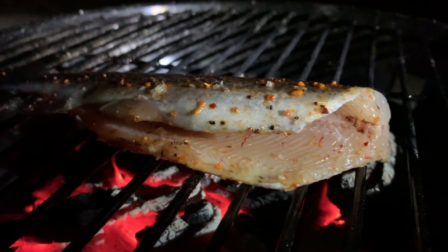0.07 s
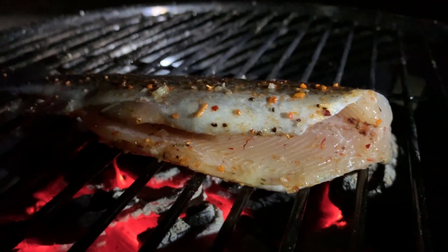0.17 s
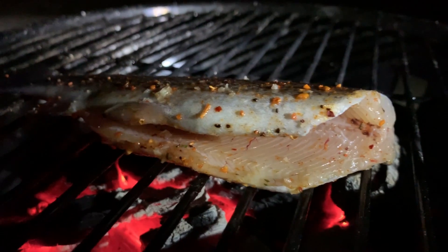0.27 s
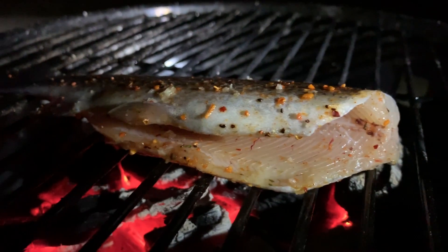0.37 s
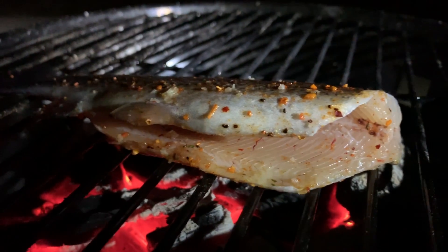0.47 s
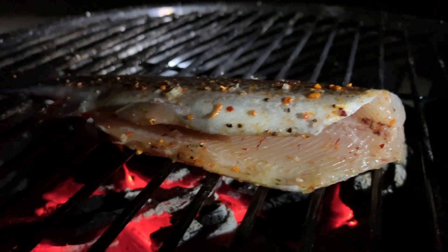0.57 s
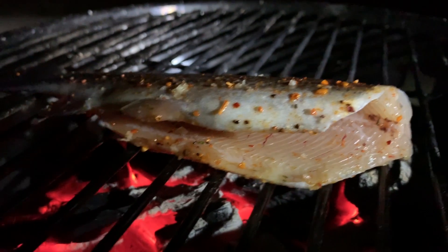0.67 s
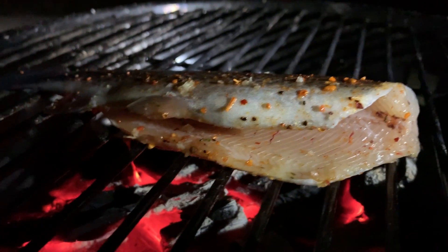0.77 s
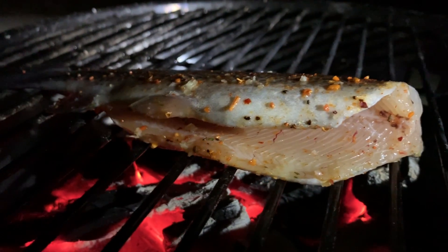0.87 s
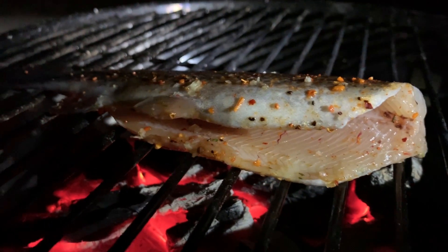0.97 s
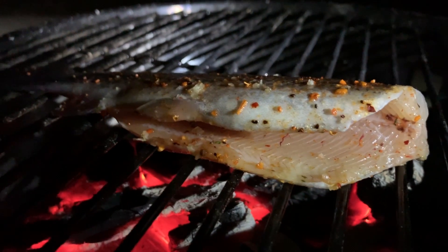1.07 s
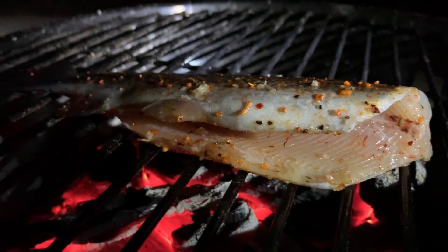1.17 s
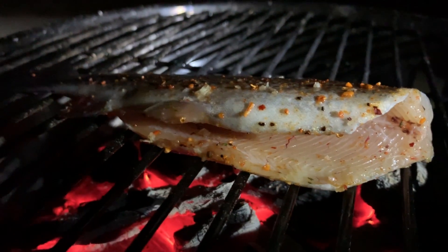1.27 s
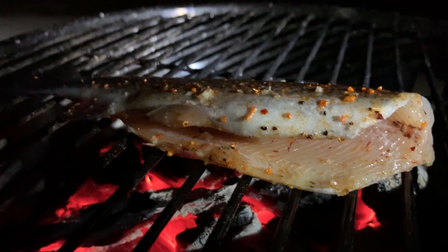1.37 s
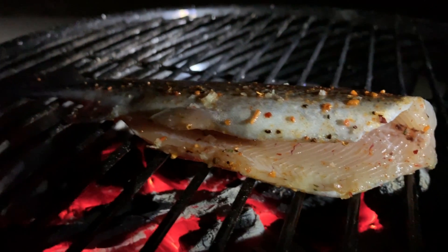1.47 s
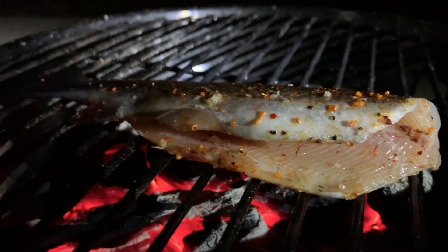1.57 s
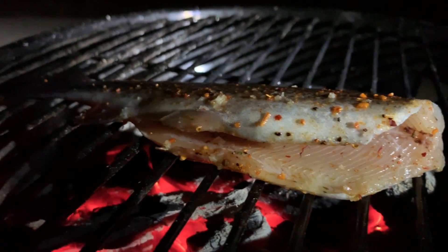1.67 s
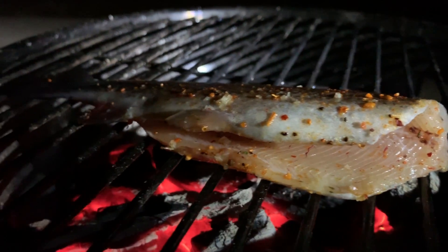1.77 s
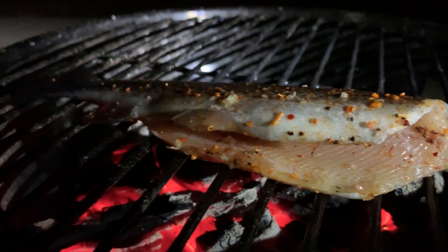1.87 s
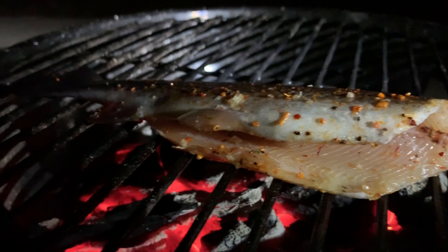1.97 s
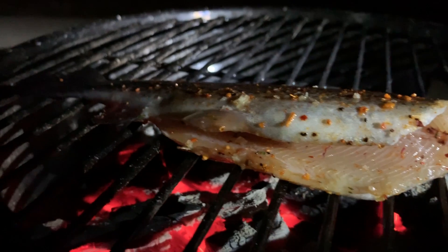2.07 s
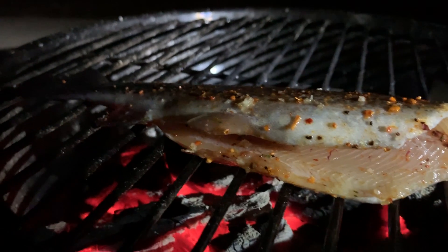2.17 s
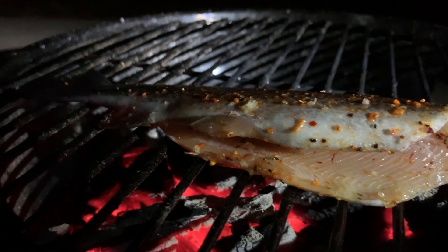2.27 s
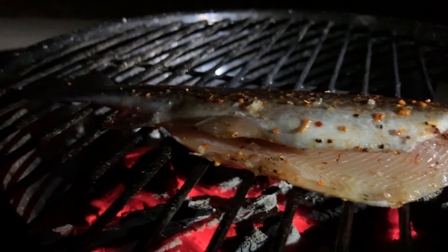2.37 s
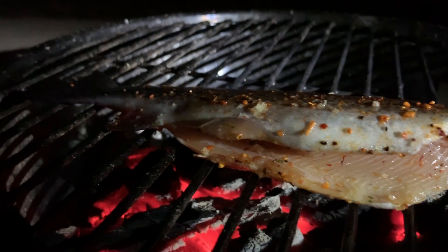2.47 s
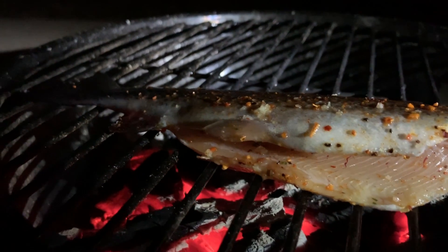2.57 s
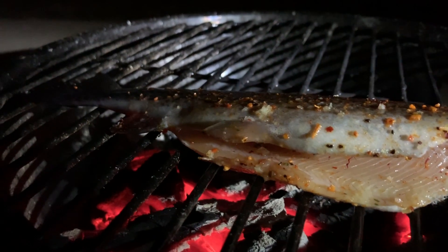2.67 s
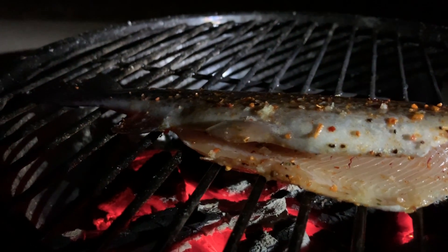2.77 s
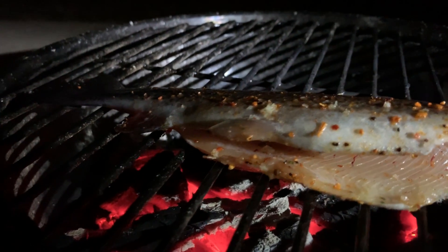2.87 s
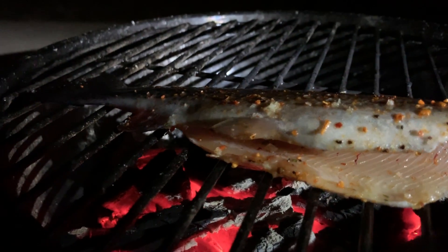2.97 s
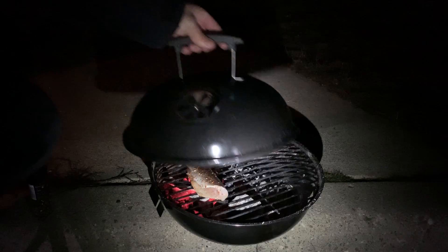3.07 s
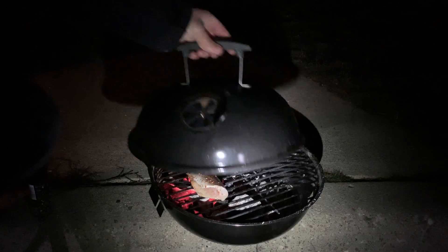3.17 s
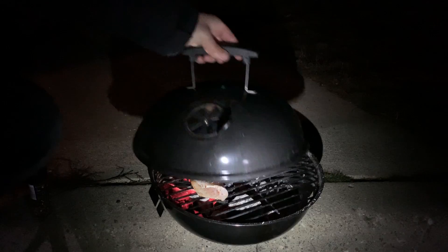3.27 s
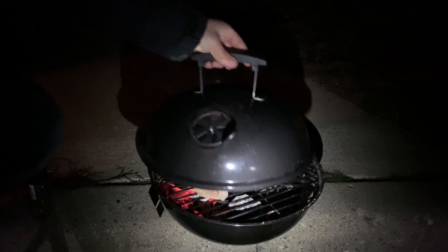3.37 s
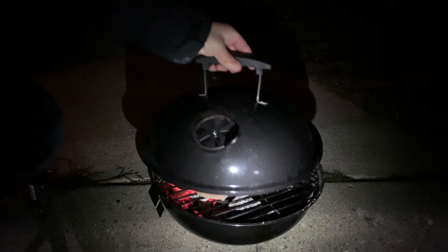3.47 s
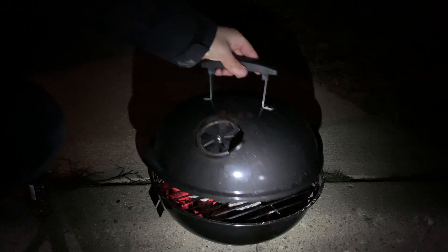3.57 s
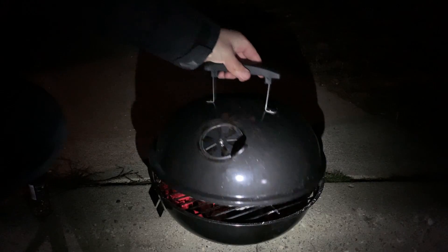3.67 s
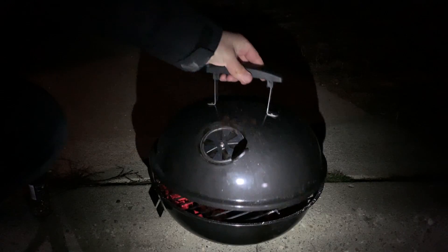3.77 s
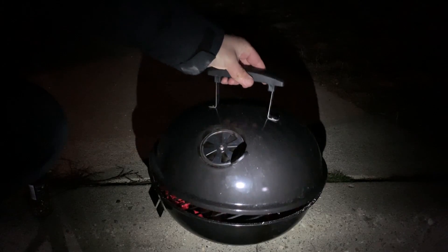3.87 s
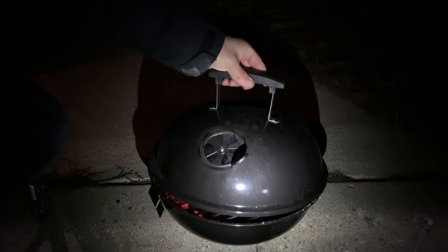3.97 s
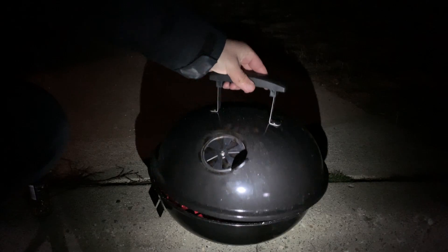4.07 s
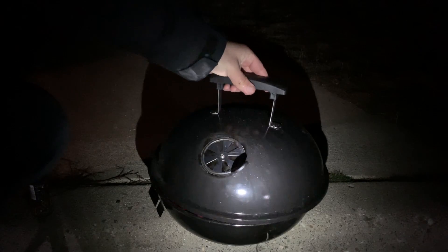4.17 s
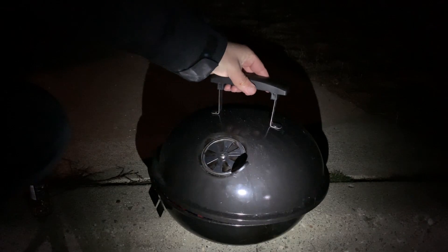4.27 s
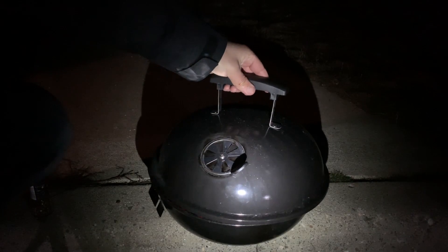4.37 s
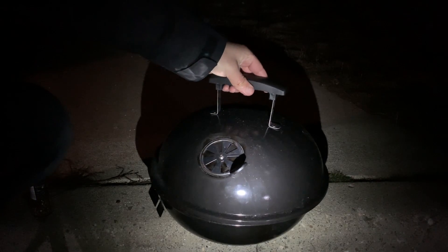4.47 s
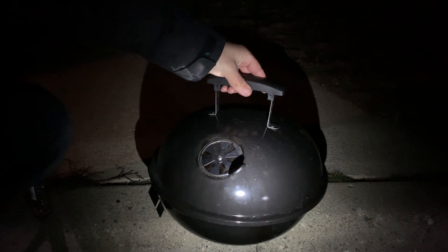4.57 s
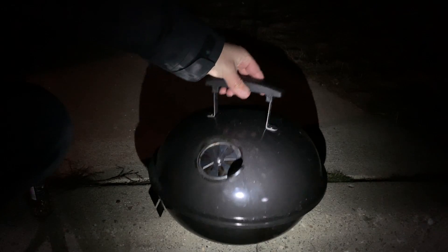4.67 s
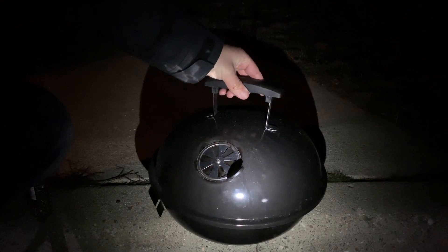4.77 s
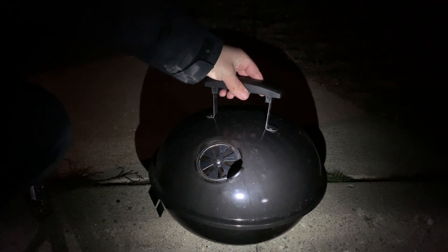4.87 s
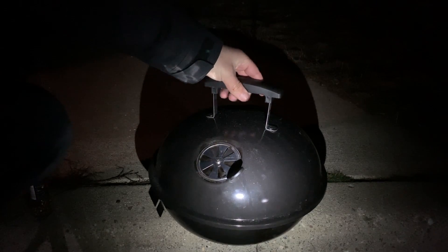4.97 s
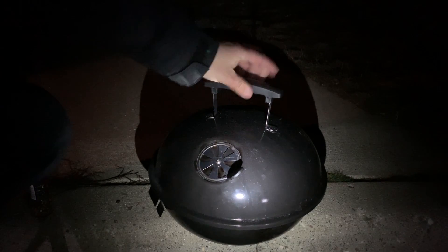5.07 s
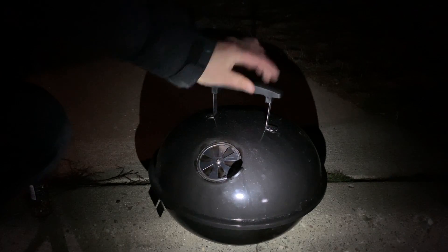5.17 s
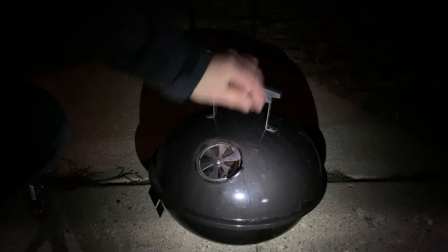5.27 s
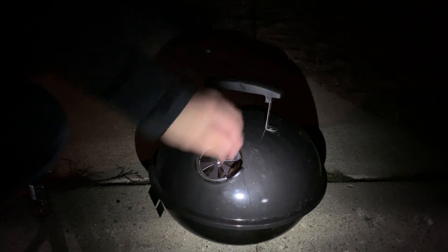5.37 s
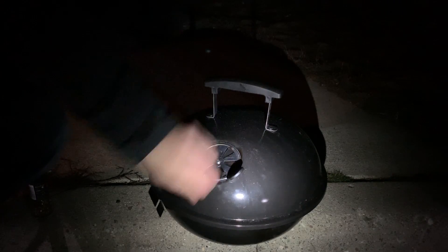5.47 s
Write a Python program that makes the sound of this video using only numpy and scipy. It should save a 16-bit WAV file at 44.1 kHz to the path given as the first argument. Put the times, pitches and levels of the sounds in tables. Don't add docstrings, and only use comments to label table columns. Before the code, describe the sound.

Fish fries softly over crackling coals at night; a faint bird whistles, a steel grill lid lands, scrapes and drops shut loudly.

```python
import sys
import numpy as np
from scipy import signal
from scipy.fft import rfft, irfft, next_fast_len
from scipy.io import wavfile
from scipy.ndimage import uniform_filter1d

SR = 44100
rng = np.random.default_rng(int(sys.argv[2]) if len(sys.argv) > 2 else 0)


def linear_from_db(decibels):
    return 10 ** (np.asarray(decibels, float) / 20)


def output_pcm(signal):
    pcm = np.clip(np.atleast_2d(signal).T, -1, 1) * 32767
    wavfile.write(sys.argv[1], SR, np.round(pcm).astype(np.int16))


N = 242991
CUT_S = 3.118
SIZE = next_fast_len(N + SR // 2)
HZ = np.maximum(np.arange(SIZE // 2 + 1) * SR / SIZE, 1)
T = np.arange(N) / SR
HALF_S, TENTH_S, TWENTIETH_S = T[:SR // 2], T[:SR // 10], T[:SR // 20]


def across(table, column, hz=HZ):
    table = np.array(table, float)
    return np.interp(np.log(hz), np.log(table[:, 0]), table[:, column])


def curve(table):
    time_s, level_db = np.transpose(table)[:2]
    return linear_from_db(np.interp(T, time_s, level_db, left=-200, right=-200))


def shape(x, gain):
    return irfft(rfft(x, SIZE) * gain, SIZE)[..., :N]


def unit(x):
    return x / np.sqrt(np.mean(x ** 2))


def walk(rate_hz):
    hold = int(SR / rate_hz)
    steps = np.repeat(rng.standard_normal(N // hold + 1), hold)
    return 1.3 * uniform_filter1d(uniform_filter1d(steps, hold), hold)[:N]


def decay(t, t60_s):
    return np.exp(-np.log(1000) * t / t60_s)


def ring(modes, phase=0.):
    hz, db, t60_s = np.array(modes, float).T[:, :, None]
    return np.sum(linear_from_db(db) * decay(HALF_S, t60_s) * np.sin(2 * np.pi * hz * HALF_S + phase), axis=0)


def add(track, start_s, sound):
    i = int(start_s * SR)
    track[..., i:i + sound.shape[-1]] += sound[..., :N - i]


def half_octave(hz, centre_hz):
    return np.cos(np.pi * np.clip(np.log2(hz / centre_hz), -.5, .5)) ** 2


def grains(density_hz, scatter_db):
    size = linear_from_db(scatter_db * rng.exponential(size=(2, N))) * rng.standard_normal((2, N))
    return size * (rng.random((2, N)) < density_hz / SR)


# pitch_hz, close_db_per_hz, far_db_per_hz
AIR = [(25.1, -70.5, -74), (60, -61, -64), (147.8, -65.5, -71.5), (215, -68.5, -75), (285, -67, -70),
       (331, -70.5, -78.5), (442, -71, -79), (680, -82, -93), (1043, -94, -101.5), (1330, -103, -110),
       (2500, -107.5, -114), (5000, -107, -113), (10300, -102, -108), (12500, -107, -113),
       (14500, -110, -116), (15970, -114, -118)]


def air():
    out, swell, noise = 0, walk(1.5), rfft(rng.standard_normal((2, SIZE)))
    gain = linear_from_db([[across(AIR, 1)], [across(AIR, 2)]])
    for centre_hz in 18 * 2 ** np.arange(0, 10, .5):
        close, far = irfft(noise * half_octave(HZ, centre_hz) * gain, SIZE)[..., :N]
        out = out + np.where(T < CUT_S, close, far) * linear_from_db(swell + 1.06 * walk(11))
    return out * np.sqrt(SR / 2)


# pitch_hz, level_db
FAT = [(2500, -20), (4000, -3), (5500, 0), (6500, 5), (7600, 12), (9000, -2), (11000, -12), (13000, -25),
       (16000, -13)]
# centre_s, change_db, half_width_s
FLURRIES = [
    (.15, -9, .2),
    (.4, 5, .09),
    (.62, -3, .1),
    (1.1, 5, .09),
    (1.88, 2, .08),
    (2.06, -6, .09),
    (2.42, 3.5, .17),
    (3.0, -3, .08),
]


def sizzle():
    fat, bubbles = 0, shape(grains(5000, 2.2), linear_from_db(across(FAT, 1)))
    for centre_hz in 2800 * 2 ** np.arange(0, 3, 1 / 3):
        band = np.cos(np.pi / 2 * np.clip(3 * np.log2(HZ / centre_hz), -1, 1)) ** 2
        fat = fat + shape(bubbles, band) * linear_from_db(1.8 * walk(6.7) + 1.2 * walk(30))
    frying_db = -63 + sum(db * np.exp(-((T - s) / width_s) ** 2) for s, db, width_s in FLURRIES)
    return unit(fat) * (T < CUT_S) * linear_from_db(frying_db + 1.45 * walk(25) + 1.2 * walk(70))


def singing(count=500):
    out, t = np.zeros((2, N)), TWENTIETH_S
    bubble_db, bubble_t60_s, max_glide = -62, .03, .04
    for when, place, size, glide, length, kind in rng.random((count, 6)):
        hz = (7400 if kind < .6 else 4100 if kind < .8 else 5600) * (1 + .24 * (place - .5))
        phase = 2 * np.pi * hz * t * (1 + max_glide * (2 * glide - 1) * t / bubble_t60_s)
        fade = decay(t, bubble_t60_s * (.5 + 2 * length)) * np.minimum(t / .002, 1)
        level_db = bubble_db - 2.4 * np.log(size) - 6 * (kind >= .6)
        add(out, when * (CUT_S - .05), linear_from_db(level_db) * fade * np.array([np.sin(phase), np.cos(phase)]))
    return out


def soft_rise(t):
    return np.minimum(t / .0005, 1) ** 2


def tick(peak_db, hz, t60_s, crack_db, width_octaves):
    t = TENTH_S
    octave = np.log2(np.maximum(np.fft.rfftfreq(len(t), 1 / SR), 1))
    crack = rng.standard_normal((2, len(t))) * (np.exp(-t / .0011) + .25 * np.exp(-t / .006))
    crack = irfft(rfft(crack) * np.exp(-((octave - np.log2(hz)) / width_octaves) ** 2), len(t))
    tone = np.sin(2 * np.pi * hz * t + np.array([[0], [np.pi / 2]])) * decay(t, t60_s)
    sound = linear_from_db(peak_db) * (.58 * soft_rise(t) * tone + linear_from_db(crack_db) * crack / np.abs(crack).max())
    return np.roll(sound, SR // 1000, axis=1)


# start_s, peak_db, ring_hz, crack_db
SPITS = [(0.1795, -51.5, 7700, 3.5), (0.7143, -45.5, 7540, 2), (0.8305, -43, 7800, -6),
         (1.0929, -36, 7130, -1.5), (1.1568, -43, 6970, -3), (1.2805, -50, 8100, 0),
         (1.2904, -45.5, 8600, 0), (1.6352, -53.5, 7050, 9), (1.8472, -42, 7730, 5.5),
         (1.9011, -39.5, 8400, 8), (1.9174, -48, 6940, 0), (2.3391, -46, 7600, 3),
         (2.5311, -42.5, 8890, 2.5), (2.7217, -48.5, 7210, 6.5), (3.468, -63, 8180, 0),
         (3.5064, -44.5, 7060, -2.5), (3.5818, -51, 7600, 4), (3.7249, -46, 8820, 2.5),
         (3.7778, -46, 6830, 0.5)]
FLAKES = [(0.2922, -47, 4840, -3), (0.3571, -33.5, 10740, -6), (0.3576, -44.5, 13200, -10),
          (1.0929, -46, 14700, -3), (1.0935, -40, 10100, -3), (1.9011, -42, 11800, 0),
          (1.7838, -42, 12900, -6), (1.7845, -49, 7250, -8), (2.462, -50, 7000, -4),
          (3.5064, -42.5, 12600, -4), (3.9644, -62.5, 13200, -6), (5.1432, -52.5, 2290, -10)]
LUMPS = [(0.5616, -53, 1730, 0.5), (1.1029, -51, 2370, -6), (2.053, -43, 840, -8), (2.0657, -38, 1690, -22),
         (2.066, -32, 1030, -9), (2.7187, -54.5, 1730, -2), (3.638, -46.5, 1260, -4.5),
         (3.7698, -58, 2480, -4), (5.342, -44, 620, -2), (5.265, -54, 850, -4)]
SPLITS = [
    (1.3992, -46, 2410, 1),
    (2.5686, -46, 4950, 7.5),
    (2.5686, -48, 2000, 6),
    (2.9766, -42, 1410, 7),
    (2.9771, -49, 3400, 7),
    (2.978, -41, 1230, -7),
    (3.1053, -52, 1860, -3),
    (3.1154, -50, 2010, -2),
]


def coals():
    out = np.zeros((2, N))
    # ticks, ring t60_s, crack width_octaves
    kinds = [(SPITS, .026, .64), (FLAKES, .04, .33), (LUMPS, .025, .6), (SPLITS, .012, .95),
             ([(3.7818, -50, 2530, -12)], .09, .4)]
    for rows, t60_s, width_octaves in kinds:
        for start_s, peak_db, hz, crack_db in rows:
            add(out, start_s - .001, tick(peak_db, hz, t60_s, crack_db, width_octaves))
    return out


# pitch_hz, level_db, t60_s
GRATE = [(2335, -4, 0.085), (3994, -11.5, 0.14), (5400, -3, 0.05), (7050, 5, .035), (7560, 3, 0.022),
         (9750, -4, 0.028), (12130, -5.5, .04), (13550, -6, .022)]


def grate_ping(start_s=2.4113):
    out = np.zeros((2, N))
    add(out, start_s - .001, tick(-22, 6800, .008, 5, 1.2))
    bars = np.array([ring(GRATE), ring(GRATE, -np.pi / 2)]) / 2
    add(out, start_s, linear_from_db(-21) * soft_rise(HALF_S) * bars)
    return out


# top_s, top_hz, climb_s, sink_s (times for one slur)
BIRD = [
    (3.165, 4660, .035, .13),
    (3.45, 4330, .055, .045),
    (3.54, 4670, .035, .06),
    (3.588, 4630, .09, .094),
    (3.852, 4370, .045, .045),
    (3.945, 4650, .032, .055),
    (4.003, 4660, .035, .075),
]


def bird():
    slur_hz, full_hz, silent_hz = 850, 4560, 3760
    full_db, climb_loss_db, sink_loss_db = -74, 48, 27
    arches = [hz - slur_hz * np.where(T < s, (T - s) / climb_s, (T - s) / sink_s) ** 2
              for s, hz, climb_s, sink_s in BIRD]
    pitch_hz = np.maximum(np.max(arches, axis=0), silent_hz)
    slur_loss_db = np.where(np.gradient(pitch_hz) > 0, climb_loss_db, sink_loss_db)
    loss_db = slur_loss_db * ((pitch_hz - full_hz) / slur_hz) ** 2
    level = linear_from_db(full_db - loss_db + 2.5 * walk(40)) * (pitch_hz > silent_hz)
    level = uniform_filter1d(level, size=400)
    phase = 2 * np.pi * np.cumsum(uniform_filter1d(pitch_hz, size=300)) / SR
    voice = np.sin(phase) * level
    under = np.sin(phase / 2) * level
    return linear_from_db(6.8) * np.array([voice + linear_from_db(-26) * under, .9 * np.roll(voice, shift=40) + linear_from_db(-7) * under])


def contact_force(contacts, rub):
    force, chatter = np.zeros((3, N)), unit(grains(4000, 2.2))[[0, 1, 0]]
    for s, db, mid_db, treble_db in contacts:
        length_s = .003 - .0001 * db
        burst = np.exp(-TENTH_S / length_s) * chatter[:, int(s * SR):][:, :SR // 10]
        burst = burst / np.sqrt(2 * np.sum(burst ** 2, axis=1, keepdims=True))
        add(force, s, linear_from_db([[db], [db + treble_db], [db + mid_db]]) * burst)
    low, treble, mid = force + rub * chatter
    treble_gain = 1 / np.sqrt(1 + (5600 / HZ) ** 8)
    rest_gain = np.sqrt(1 - treble_gain ** 2)
    mid_gain = 1 / (1 + (3100 / HZ) ** 8)
    out = shape(low, rest_gain * (1 - mid_gain)) + shape(mid, rest_gain * mid_gain)
    return out + shape(treble, treble_gain * linear_from_db(4.5))


# pitch_hz, t60_s, held_db, seated_db
SHEET = [(300, 0.053, -18, -24), (500, .07, -15, -10.5), (790, 0.055, -12, -3.5), (1080, .08, -9, -9),
         (1550, 0.13, -0.5, -0.5), (2180, 0.17, -1, -2), (3193, 0.16, -7.5, -7.5), (4300, 0.15, -7.5, -5.5),
         (5720, .15, -13, -12.5), (6430, .15, -9, -6.5), (8050, .16, 1, -2), (9000, .15, -9, -4.5),
         (10700, 0.098, -13, -11), (13700, 0.16, -12.5, -23), (16000, 0.12, -30, -23)]


def sheet(damping, column):
    t, out = HALF_S, 0
    noise = rfft(rng.standard_normal(len(t)))
    hz = np.maximum(np.fft.rfftfreq(len(t), 1 / SR), 1)
    gain = linear_from_db(across(SHEET, column, hz))
    for centre_hz in 250 * 2 ** np.arange(0, 6.5, .5):
        fade = decay(t, damping * across(SHEET, 1, centre_hz)) + 1.8 * np.exp(-t / .0014)
        out = out + irfft(noise * half_octave(hz, centre_hz) * gain, len(t)) * fade
    return out


def clank(contacts, modes, modes_db, damping, column, rub=0):
    force, out = contact_force(contacts, rub), []
    for port in range(2):
        body = linear_from_db(modes_db) * ring(modes, np.pi / 2 * port) + sheet(damping, column)
        out.append(shape(force, rfft(body, SIZE)))
    return np.array(out)


def twins(hz, rings, split=.009):
    db, t60_s = np.transpose(rings)
    twin_hz = np.multiply(hz, 1 + split * rng.uniform(-1, 1, len(hz)))
    return np.r_[np.c_[hz, db - 2.5, t60_s], np.c_[twin_hz, db - 8.5, .8 * t60_s]]


# start_s, blow_db, upper_middle_db, treble_db
LANDING = [(4.1705, -19, -1, -8), (4.175, -17, -3, -16), (4.1935, -16, 5, -5), (4.1997, -4, -5, -12),
           (4.2055, -8, -3, -9), (4.2155, -8, -2, -8), (4.2245, -9, -1, -7), (4.2345, -7, 0, -8),
           (4.241, -9, 0, -8), (4.2495, -12, -3, -8), (4.258, -16, 0, -8), (4.2655, -14, 0, -8),
           (4.276, -17, 1, -9), (4.287, -23, -2, -8), (4.301, -26, -2, -8), (4.345, -44, 0, -6)]
HELD_HZ = [829, 1196, 1050, 1437, 1577, 1798, 1850, 1905, 2045, 2442, 2514, 2805, 2950, 3490, 3830, 4124,
           4388, 4732, 7215, 7850]
# level_db, t60_s
LID_HELD = [(-16, 0.07), (-14, .13), (-36, .5), (-14, .22), (-8, .17), (-6, 0.17), (-10, .25), (-9, .15),
            (-12, .15), (-8, .13), (-13, .18), (-20, .4), (-16, .3), (-16, .14), (-16, .2), (-17, .18),
            (-12, .22), (-21, .2), (-11, .13), (-6.5, .13)]


def lid_landing():
    return linear_from_db(-1.8) * clank(LANDING, twins(HELD_HZ, LID_HELD), modes_db=-8.5, damping=1.14, column=2)


def rebounds(s, db, mid_db, treble_db, gap_s, growth, hold_s, fade_db_s, count):
    after_s = np.r_[0, np.cumsum(gap_s * growth ** np.arange(count - 1))]
    return [(s + a, db - fade_db_s * max(a - hold_s, 0), mid_db, treble_db) for a in after_s]


# start_s, blow_db, upper_middle_db, treble_db
SETTLING = [(4.457, -46, 3, -3), (4.468, -47, 5, -5), (4.483, -46, 3, -5), (4.539, -45, 10, 1),
            (4.5633, -40, 12, -1), (4.58, -42, 3, -6), (4.606, -36, 9, -12), (4.637, -38, 3, 9),
            (4.648, -41, 0, 11), (4.664, -43, 0, 6), (4.711, -35, 2, 5), (4.7185, -24, 2, -1),
            (4.7232, -1.5, 0, -3)]
# time_s, level_db
SCRAPE = [
    (4.44, -63),
    (4.53, -56),
    (4.55, -53.5),
    (4.63, -48),
    (4.7, -47),
    (4.715, -36),
    (4.723, -22.5),
]
SHUT_HZ = [1146, 1297, 1577, 1700, 1848, 1965, 2035, 2266, 2443, 2478, 2620, 2770, 2910, 3112, 3309, 3760,
           4078, 4400, 5093, 5250, 6862, 7215, 7660, 7838]
# level_db, t60_s
LID_SHUT = [(-25, 0.07), (-18, .11), (-13, .2), (-19, .2), (-12, .12), (-16, .22), (-11, 0.15), (-16, .18),
            (-14, 0.15), (-14, .25), (-18, .25), (-15, .24), (-14, .25), (-14, 0.19), (-17, .16),
            (-12.5, .13), (-19, 0.19), (-16, .17), (-17, .13), (-18, .13), (-13, .1), (-15, .14),
            (-15, .13), (-9, .12)]


def lid_shutting():
    bounces = rebounds(4.727, -6, .3, -9, gap_s=.008, growth=1.64, hold_s=.002, fade_db_s=255, count=5)
    rub = curve(SCRAPE) * linear_from_db(-24 + 4 * walk(60))
    modes = twins(SHUT_HZ, LID_SHUT)
    return linear_from_db(-1.2) * clank(SETTLING + bounces, modes, modes_db=-6.5, damping=1.0, column=3, rub=rub)


# start_s, peak_db, pitch_hz
BOOMS = [(4.17, -23.5, 245), (4.1736, -12, 225), (4.1924, -5.5, 238), (4.202, -5, 191), (4.238, -8, 251),
         (4.257, -15, 270), (4.269, -9.5, 249.6), (4.288, -17, 262), (4.572, -28, 200), (4.595, -27, 230),
         (4.625, -29, 240), (4.6057, -15, 290), (4.727, -29.5, 76), (4.2, -40, 70), (4.893, -31, 170)]
# start_s, peak_db, pitch_hz, t60_s
SHUT = [
    (4.7276, 7, 185, .045),
    (4.738, -1.5, 232, .068),
]
# start_s, peak_db, pitch_hz, t60_s
BOWL = [
    (4.7243, -8, 786, .045),
    (4.727, -13.5, 505, .08),
    (4.73, -13, 383, .09),
    (4.728, -13, 142, .07),
    (4.2, -21, 330, .1),
]
# start_s, peak_db, pitch_hz, t60_s
ROCKING = [(4.1745, -32, 2442, .12), (4.1745, -37, 2950, .1), (4.2, -24, 2442, .12),
           (4.222, -25, 4388, .12), (4.171, -33, 930, .06), (4.266, -25.5, 1257, .32),
           (4.27, -30, 1329, .4), (4.28, -41, 2805, .4), (4.28, -39, 2950, .3), (4.27, -27, 1798, .17),
           (4.3, -35, 4385, .07), (4.352, -49, 4380, .15), (4.54, -55, 4090, .06), (4.564, -48, 3770, .06),
           (4.564, -46, 4390, .08), (4.565, -47, 7838, .1), (4.606, -48, 3760, .08), (4.606, -43, 1500, .1),
           (4.638, -44, 2480, .12), (4.638, -35, 8190, .1), (4.645, -36, 7700, .13), (4.862, -55, 1590, .2)]


def dome():
    out = np.zeros(N)
    booms = [(s, db, hz, 12.5 / hz) for s, db, hz in BOOMS]
    for s, db, hz, t60_s in booms + SHUT + BOWL + ROCKING:
        add(out, s, -ring([(hz, db, t60_s)]) * (1 - np.exp(-HALF_S * hz * 3)))
    return np.array([out, np.roll(out, shift=50)])


# pitch_hz, level_db
CLOTH = [(600, -1.5), (1500, 3.5), (3000, -4.5), (5500, -8.5), (7500, 4), (10000, -12), (13000, -16),
         (16000, -20)]
# start_s, attack_s, hold_s, level_db
BRUSHES = [
    (5.055, .015, .06, -82),
    (5.135, .015, .01, -63),
    (5.3, .08, .04, -70),
    (5.42, .04, .06, -63),
]


def sleeve():
    cloth, gain = unit(shape(grains(8000, 1.5), linear_from_db(across(CLOTH, 1)))), 0
    for s, attack_s, hold_s, db in BRUSHES:
        release_s = np.maximum(T - s - attack_s - hold_s, 0)
        gain = gain + linear_from_db(db - 180 * release_s) * np.clip((T - s) / attack_s, 0, 1) ** 2
    return cloth * gain * linear_from_db(5.5 + 1.4 * walk(30))


# pitch_hz, right_lead_turns, left_minus_right_db, air_likeness (0-1), lid_likeness (0-1)
PORTS = [(60, 0, -0.3, 0.99, 0.99), (298.7, 0.0023, 0, 0.83, 0.98), (724, 0, 0.4, 0.55, .95),
         (1314, 0, 3.6, 0, .75), (2300, -0.07, 2, 0, .75), (3060, -0.2, 1.3, 0, .75),
         (3700, -0.07, 0, 0, .6), (4400, -0.04, -0.5, 0.1, 0.65), (5670, -0.45, -2, 0.4, .4),
         (7000, -0.03, -0.6, 0.97, 1), (8650, 0.19, 0.3, 1, 0.9), (9960, 0.453, 0, 0.97, 1),
         (11100, .55, 0, 1, 0.98), (11520, 0.62, 0.2, 0.9, .9), (12500, .84, 0, .9, .8),
         (13400, 0.99, -0.2, 1, 1), (14300, 1.06, 0, .9, 0.9), (15600, 1.3, -0.5, .5, .6)]


def ports(pair, column):
    like = np.clip(across(PORTS, column), 0, 1)
    both = shape(pair[0], np.sqrt((1 + like) / 2))
    own = shape(pair[1], np.sqrt((1 - like) / 2))
    turns = np.interp(HZ, *np.array(PORTS).T[:2])
    lead = np.exp(1j * np.pi * turns) * linear_from_db(-across(PORTS, 2) / 2)
    return np.array([shape(both + own, 1 / lead), shape(both - own, lead)])


def scene():
    diffuse = air() + sizzle() + singing() + sleeve()
    distinct = coals() + grate_ping() + bird() + lid_landing() + lid_shutting() + dome()
    return ports(diffuse, column=3) + ports(distinct, column=4)


def roll_off(x):
    return signal.sosfilt(signal.butter(12, 15740, fs=SR, output="sos"), x)


def record(dry):
    mix = np.clip(shape(dry, 1 / np.sqrt(1 + (19 / HZ) ** 4)), -1, 1)
    return roll_off(mix)


dry = scene()
out = record(dry)
output_pcm(out)
```